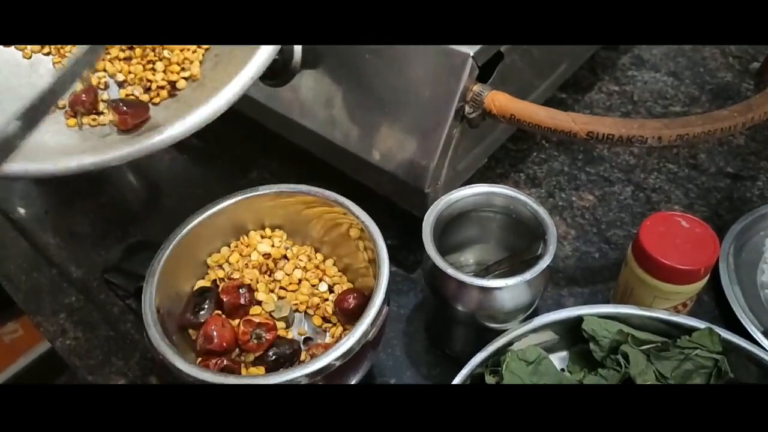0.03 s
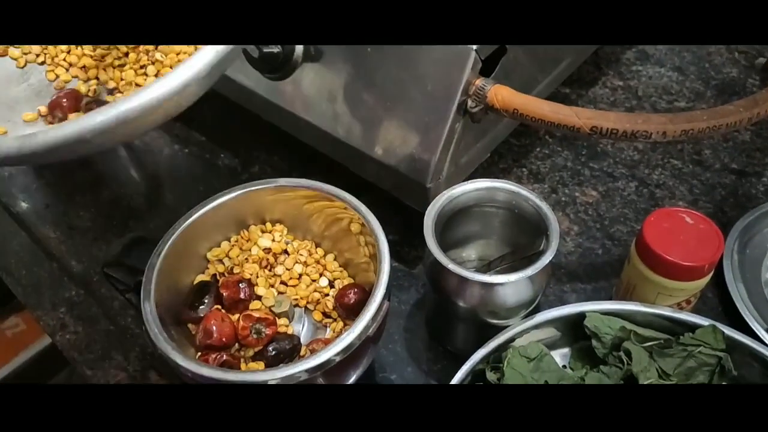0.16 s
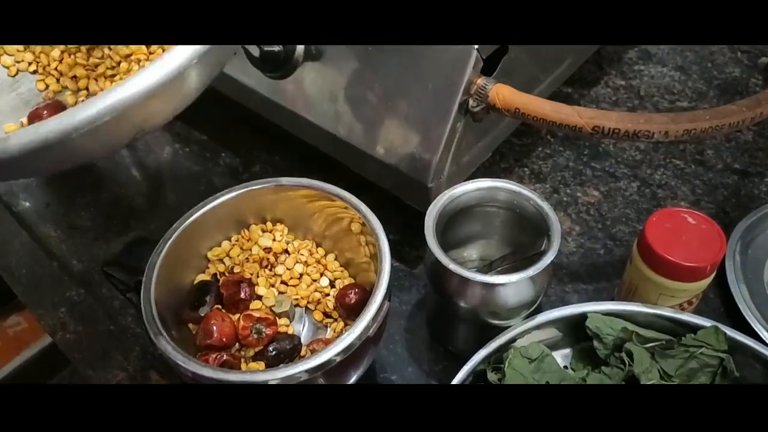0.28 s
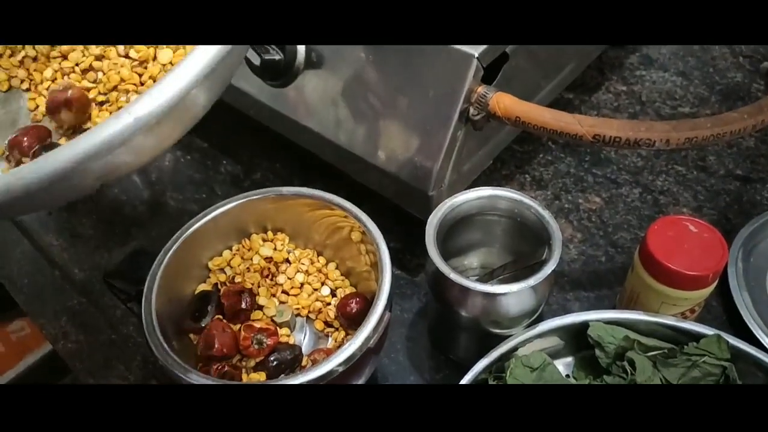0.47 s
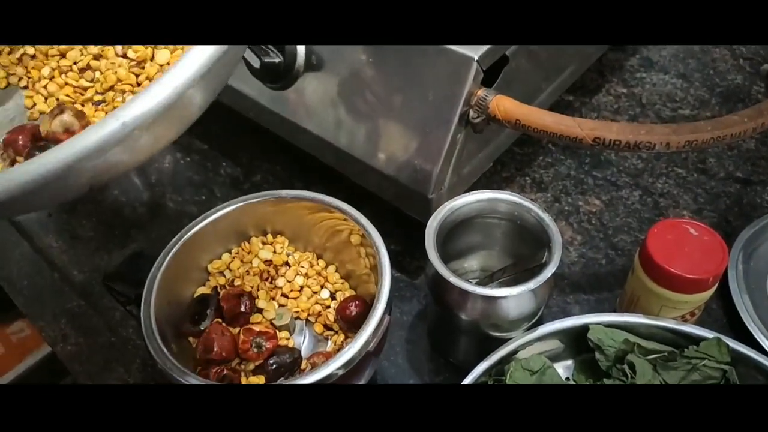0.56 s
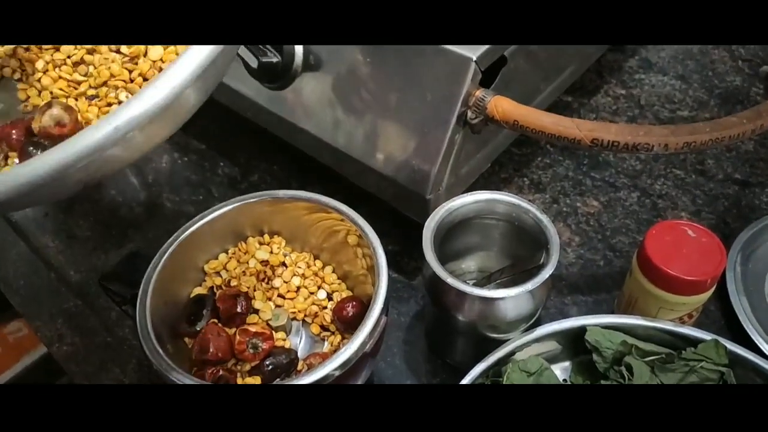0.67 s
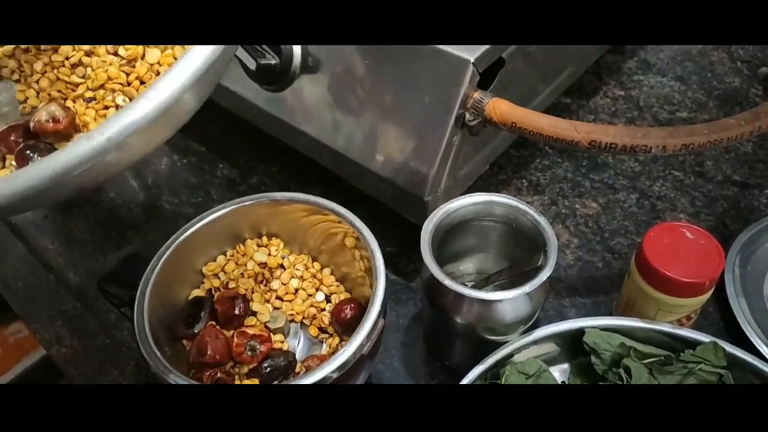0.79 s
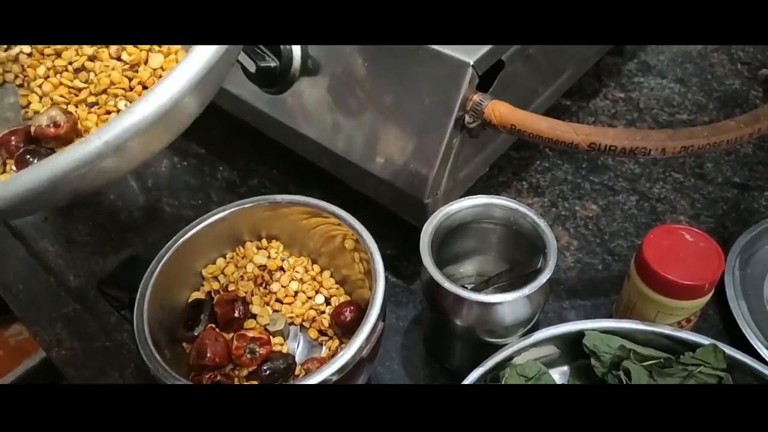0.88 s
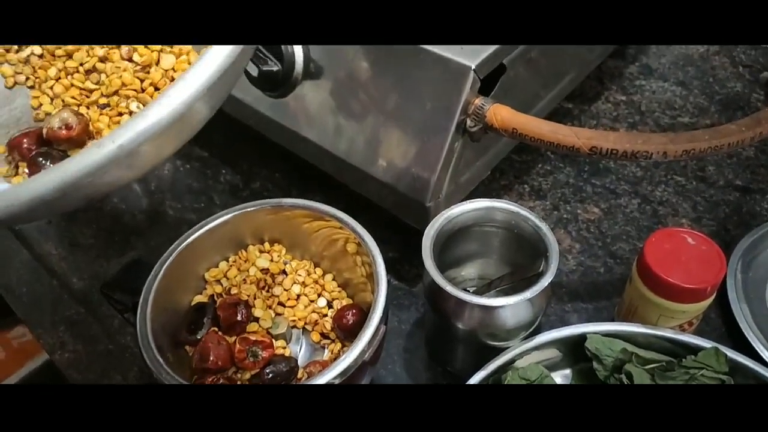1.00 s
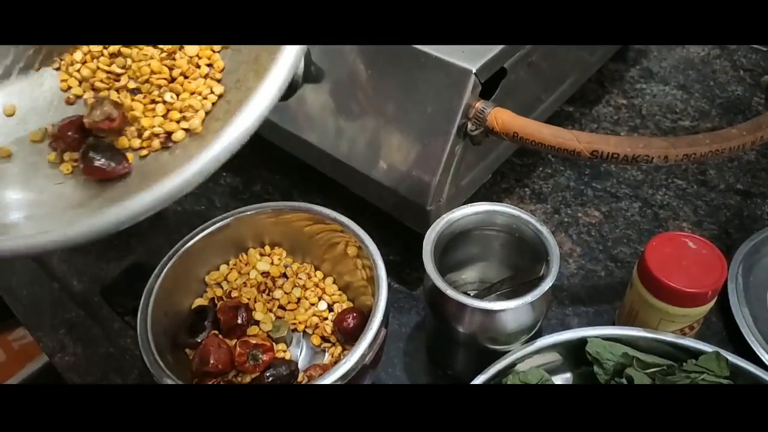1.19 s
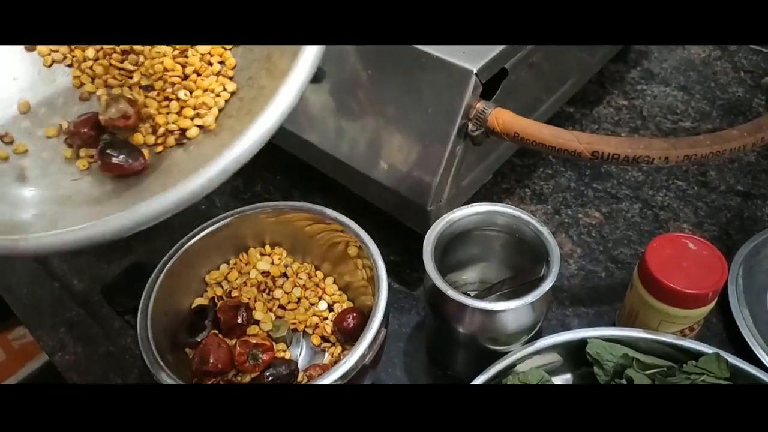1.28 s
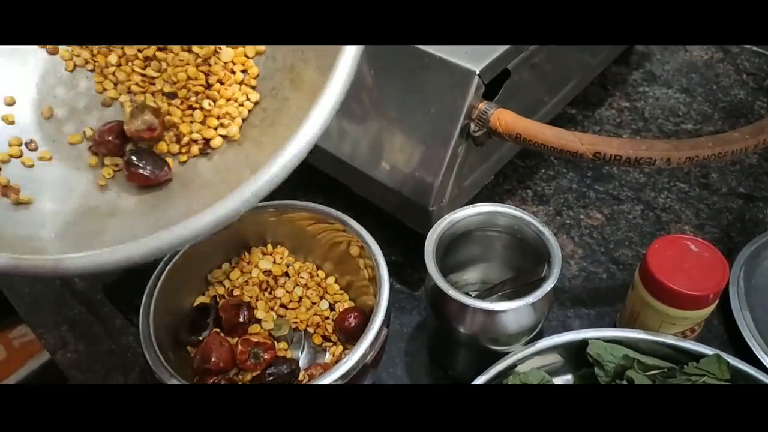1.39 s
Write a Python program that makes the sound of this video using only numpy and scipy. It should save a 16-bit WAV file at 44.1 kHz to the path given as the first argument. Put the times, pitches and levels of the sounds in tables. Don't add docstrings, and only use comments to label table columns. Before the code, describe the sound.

A metal spoon strikes a thin pan of dry lentils twice, the first knock harder and clipping, each ringing briefly as grains rattle and slide; stray ticks, faint hum and hiss, small hard kitchen, close bright stereo microphone.

```python
import sys
import numpy as np
from scipy import signal
from scipy.fft import rfft, irfft
from scipy.io import wavfile
from scipy.ndimage import uniform_filter1d

SR = 44100
rng = np.random.default_rng(int(sys.argv[2]) if len(sys.argv) > 2 else 0)


def wav_out(sig):
    wavfile.write(sys.argv[1], SR, np.round(np.clip(np.atleast_2d(sig).T, -1, 1) * 32767).astype(np.int16))


def decibels_to_gain(level_db):
    exponent = np.asarray(level_db, float) / 20
    return 10 ** exponent


N = 63945
REGRIP_S = 1.0
BURST_SIZE = SR // 2
ROOM_T60_S = 0.34
MODE_SPLIT = 0.022


def unit(x):
    return x / np.sqrt(np.mean(x ** 2) + 1e-20)


def at_hz(points, hz):
    p = np.array(points)
    return np.interp(np.log(np.maximum(hz, 1)), np.log(p[:, 0]), p[:, 1])


def above(x, hz):
    return signal.sosfilt(signal.butter(4, hz, "high", fs=SR, output="sos"), x)


def add(out, x, s, pan_db):
    i = int(s * SR)
    out[:, i:i + x.shape[1]] += (x * decibels_to_gain([[pan_db / 2], [-pan_db / 2]]))[:, :N - i]


# frequency in Hz, likeness from -1 to 1.
PORT_LIKENESS = [(30, 0.94), (70, -0.49), (130, 1), (300, 0.7), (700, 0.4), (1400, -0.019), (3000, 0.031)]


def noise(spectrum, size):
    hz = np.arange(size // 2 + 1) * SR / size
    mid, side = rfft(rng.standard_normal((2, size))) * decibels_to_gain(at_hz(spectrum, hz)) * (hz > 15)
    alike = np.clip(at_hz(PORT_LIKENESS, hz), -1, 1)
    return unit(irfft(np.sqrt(1 + alike) * mid + np.sqrt(1 - alike) * side * [[1], [-1]], size))


def dying(t60_s, size, rise_s=0.00052):
    t = np.arange(size) / SR
    return (1 - np.exp(-t / rise_s)) ** 2 * decibels_to_gain(-60 * t / t60_s)


def contact(spectrum, t60_s):
    room = decibels_to_gain(-12) * dying(ROOM_T60_S, BURST_SIZE, 0.00053)
    return noise(spectrum, BURST_SIZE) * (dying(t60_s, BURST_SIZE) + room)


def modes(table, split=0., size=BURST_SIZE):
    hz, db, t60_s = np.repeat(np.array(table), 5, axis=0).T[:, :, None]
    t = np.arange(size) / SR
    level_chance, phase_chance, pitch_chance = rng.standard_normal((3, 2, len(hz), 1))
    spread = np.tile(np.linspace(-1.3, 1.3, 5), len(table))[:, None] + 0.25 * pitch_chance[0]
    lag_s = 0.0003037 * np.array([1, 0])[:, None, None]
    phase = 2 * np.pi * hz * (1 + split * spread) * (t - lag_s) + 0.92 * phase_chance
    level = decibels_to_gain(db - 12 + 2.26 * level_chance - 60 * t / t60_s)
    return -np.sum(level * np.sin(phase), axis=1) * (1 - np.exp(-t / 0.0002))


def peaks(table):
    return [(hz, db, 5.0 / max(width_hz, 40)) for hz, width_hz, db in table]


# start in seconds, crack in dB, pan ring in dB, left-right in dB.
KNOCKS = [
    (0.3474, 17.5, 5.5, -2),
    (1.0123, 14.5, 6, -2.5),
]
# frequency in Hz, density in dB per Hz.
CRACK_COLOURS = [
    [(59, -74.5), (100, -9.5), (804, 6.5), (3000, -10), (6060, -0.5), (7640, 6), (9430, 3.5), (10300, 4.5),
     (15300, -18)],
    [(59, -55), (100, -27.5), (912, -8.5), (2670, -17.5), (3290, -10), (3980, -15.5), (6320, -6.5),
     (10700, -1.5), (15300, -22.5)],
]
# frequency in Hz, level in dB, t60 in seconds.
PAN_LEVEL = [(187, -20.5, 0.092), (310.2, -12.5, 0.39), (354, 3.5, 0.036), (500, -13.5, 0.7),
             (611.7, 2, 0.34), (692, 4, 0.31), (792, -5, 0.52), (821.5, 6, 0.21), (928, -9, 0.81),
             (1052, -4, 0.31), (1232, -16.5, 0.62), (1236, -4.5, 0.37), (1410, -9.5, 0.21),
             (1690, -38.5, 0.45)]
# frequency in Hz, level in dB, t60 in seconds.
PAN_TIPPED = [(317, -56, 0.042), (479, -16, 0.28), (647, -8, 0.24), (637, -17.5, 0.49), (784, -13, 0.42),
              (860, -6.5, 0.34), (924, -24, 0.081), (936, -16.5, 0.44), (1339, -2, 0.396),
              (1487, -19.5, 0.6), (1985, 1, 0.11), (3038, -14.5, 0.43), (3114, -14, 0.41),
              (4250, -26, 0.22)]
# frequency in Hz, width in Hz, level in dB.
RIM_RINGS = [
    [(4390, 41, -11.5), (4890, 42, -11.5), (5196, 17, -6.5), (5330, 78, -3), (6650, 118, -3.5),
     (7900, 120, -0.5), (8597, 150, 0.5), (10480, 87, -0.5), (11620, 91, 5.5), (12200, 75, -9),
     (13000, 42, -17.5), (14270, 8, -16), (14900, 27, -9.5)],
    [(3145, 59, -20.5), (3690, 39, -31), (3920, 36, -40), (4730, 220, -3.5), (6110, 46, -11),
     (7900, 310, -2), (8840, 85, -17), (9070, 100, -1), (10380, 93, 3), (11960, 31, -10.5), (12050, 120, 4),
     (13000, 66, -14.5), (13360, 97, -12)],
]
# frequency in Hz, level in dB, t60 in seconds.
HANDLE_JOLT = [(108, -44, 0.059), (153.5, -18, 0.4), (191, -17, 0.017), (249, -12.5, 0.2)]
JOLT_DB = [-14.5, -16.5]


def knocks():
    out = np.zeros((2, N))
    bodies = [PAN_LEVEL, PAN_TIPPED]
    for knock, colour, body, rim, jolt_db in zip(KNOCKS, CRACK_COLOURS, bodies, RIM_RINGS, JOLT_DB):
        s, crack_db, ring_db, pan_db = knock
        crack = contact(colour, 0.021) + decibels_to_gain(-5.5) * modes(peaks(rim), 0.006)
        ring = modes(body, MODE_SPLIT)
        jolt = modes(HANDLE_JOLT, 0.069)
        hit = decibels_to_gain(crack_db - 12.5) * crack + decibels_to_gain(ring_db - 15.5) * ring + decibels_to_gain(jolt_db) * jolt
        add(out, hit, s, pan_db)
    return above(out, 77)


def through(clicks, response):
    response = unit(response) / np.sqrt(response.shape[1])
    return signal.fftconvolve(clicks[None], response, axes=1)[:, :N]


# frequency in Hz, density in dB per Hz.
GRAIN_COLOUR = [(880, -24), (1500, -14.5), (2280, -18), (2740, -17), (3700, -16), (4160, -16.5),
                (4680, -12.5), (9980, -1), (15300, -20)]


def slide(rows, body, shimmer):
    s, db, low_db = np.transpose(rows)
    t = np.arange(N) / SR
    grains_per_s, grain_spread_db, clump_db = 2000, 3.5, 2
    clump = uniform_filter1d(uniform_filter1d(rng.standard_normal(N), size=150), size=150)
    sizes = decibels_to_gain(grain_spread_db * np.minimum(rng.exponential(1, N), 4)) * rng.choice([-1, 1], N)
    clicks = unit(sizes * (rng.random(N) < grains_per_s / SR) * decibels_to_gain(clump_db * unit(clump)))
    clicks = clicks * decibels_to_gain(np.interp(t, s, db)) * (t > s[0]) * (t < s[-1])
    dealt = rng.integers(0, 4, N)
    out = sum(through(clicks * (dealt == k), contact(GRAIN_COLOUR, 0.011)) for k in range(4))
    out = out + decibels_to_gain(-1) * through(clicks, modes(peaks(shimmer), 0.0046, size=SR // 4))
    out = out + through(clicks * decibels_to_gain(np.interp(t, s, low_db)), modes(body, MODE_SPLIT))
    return out * decibels_to_gain([[-1], [1]])


# time in seconds, rattle in dB, share in the pan's low modes in dB.
SLIDES = [
    [(0.35, -14, 6.5), (0.40, -22.5, -33.5), (0.47, -18.5, -18), (0.51, -26, -6.5), (0.58, -21.5, -9),
     (0.63, -15, -16), (0.67, -32.5, -10), (0.72, -45, -7), (0.78, -59.5, 14)],
    [(1.015, -10.5, -16.5), (1.05, -27, 5), (1.10, -22.5, -50), (1.14, -30, -16), (1.18, -51, -10),
     (1.23, -44, -1.5)],
    [(0.17, -40.5, -20.5), (0.19, -41, -26.5), (0.23, -37, -46), (0.27, -49.5, -38), (0.31, -42, -23)],
    [(1.26, -45, -4.5), (1.34, -44.5, -18), (1.41, -37.5, -30), (1.449, -62, -47)],
]
# frequency in Hz, level in dB, t60 in seconds.
PAN_SLIDING = [(476, -5, 0.13), (544, -4, 0.064), (631, -2, 0.33), (710.3, 5, 0.092), (795, -4, 0.46),
               (882, 3.5, 0.17), (965, 0.5, 0.12), (1135, -2.5, 0.05), (1370, 1, 0.54), (2180, -4.5, 0.013),
               (2284, 1, 0.093), (3090, -10, 0.17), (3790, -4.5, 0.064)]
# frequency in Hz, width in Hz, level in dB.
SHIMMER_LEVEL = [(3290, 62, -22.5), (3615, 78, -13.5), (4630, 78, -27), (4960, 51, -24), (5675, 38, -7.5),
                 (6120, 42, -17), (6640, 38, -24), (7480, 16, -5.5), (8700, 31, 3.5), (9630, 32, -2),
                 (10540, 25, -6), (10350, 41, -9.5), (11000, 78, -8.5), (11200, 160, -7.5)]
# frequency in Hz, width in Hz, level in dB.
SHIMMER_TIPPED = [(3120, 52, -13), (3636, 40, -8), (4650, 120, -2), (7120, 92, -22), (6860, 37, 1.5),
                  (7900, 26, -9), (7900, 56, 3.5), (8340, 53, 12), (10040, 48, -16.5), (10600, 55, -27),
                  (11600, 71, -8.5), (11800, 110, -4)]


def slides():
    out = np.zeros((2, N))
    for rows in SLIDES:
        shimmer = SHIMMER_LEVEL if rows[0][0] < REGRIP_S else SHIMMER_TIPPED
        out = out + slide(rows, PAN_SLIDING, shimmer)
    return above(out, 366)


# frequency in Hz, width in Hz, depth from 0 to 1.
RADIATION_DIPS = [
    [(3600, 200, .6), (4300, 150, .5), (5800, 250, .9), (7080, 300, .92), (8350, 200, .5), (12000, 300, .8),
     (13500, 300, .7)],
    [(3484, 150, .8), (4216, 300, .97), (5530, 350, .97), (7120, 300, .92), (8550, 200, .5),
     (11300, 300, .6), (12800, 300, .8), (14200, 400, .8)],
]


def radiate(x, dips):
    for hz, width_hz, depth in dips:
        notched = signal.lfilter(*signal.iirnotch(hz, hz / width_hz, SR), x)
        x = x + np.clip(depth, 0, 1) * (notched - x)
    return x


# start in seconds, peak in dB, pitch in Hz, left-right in dB, burst t60 in seconds.
TICKS = [(0.0264, -33, 9600, -6, 0.023), (0.1778, -20.5, 7000, -2.5, 0.072),
         (0.2120, -12, 9160, 0.5, 0.019), (0.221, -9.5, 8700, -5, 0.0071), (0.2345, -10, 8700, 6, 0.016),
         (0.4445, -6.5, 9400, 3, .015), (0.4670, -7, 10500, -4.5, 0.017), (0.6173, -8.5, 10000, 4, .012),
         (0.7185, -25.5, 8700, 2, .01), (1.1032, -10, 8370, -4, 0.02), (1.162, -14.5, 8600, 6.5, 0.023),
         (1.253, -16, 9110, -2, 0.027), (1.3164, -17.5, 8000, -2.5, 0.015),
         (1.3457, -14.5, 8700, -2, 0.013), (1.3999, -21, 6700, 0, 0.0099), (1.416, -25.5, 9190, -5, 0.0073)]


def ticks():
    out = np.zeros((2, N))
    t = np.arange(BURST_SIZE) / SR
    room = decibels_to_gain(-13) * dying(ROOM_T60_S, BURST_SIZE, 0.005)
    for s, db, hz, pan_db, t60_s in TICKS:
        burst = dying(0.85, BURST_SIZE) * decibels_to_gain(-60 * np.maximum(t - 0.0035, 0) / t60_s)
        echo = decibels_to_gain(-13) * np.roll(burst, int(0.0097 * SR))
        grain = noise(GRAIN_COLOUR, BURST_SIZE) * (burst + echo + room)
        grain = grain + modes([(hz, -4, 0.015)], 0.017)
        add(out, decibels_to_gain(db - 11.5) * grain, s - 0.0006, pan_db)
    return above(out, 3750)


# frequency in Hz, density in dB per Hz.
FLOOR_COLOUR = [(20, 10.5), (160, 1.5), (330, -10.5), (1050, -7.5), (1900, -10.5), (5000, -6), (9500, -4.5),
                (15300, -16)]


def kitchen_floor():
    return decibels_to_gain(-46.5) * noise(FLOOR_COLOUR, N + 1)[:, :N]


# frequency in Hz, left-right in dB.
PORT_BALANCE = [(60, 0), (150, -1.5), (500, -1.5), (1200, 4), (2500, 7), (5000, 0), (9000, 1), (13000, -2)]


def ports(x):
    tilt_db = at_hz(PORT_BALANCE, np.arange(N // 2 + 1) * SR / N) / 2
    return irfft(rfft(x) * decibels_to_gain([tilt_db, -tilt_db]), N)


def scene():
    pan = slides() + knocks()
    level, tipped = [radiate(pan, dips) for dips in RADIATION_DIPS]
    pan = np.where(np.arange(N) < REGRIP_S * SR, level, tipped)
    return ports(pan + ticks() + kitchen_floor())


# time in seconds, reach in dB.
REACH = [(0.0, 9), (0.04, 7.5), (0.125, -0.5), (0.16, 67), (0.21, 19.5), (0.245, 9.5), (0.30, 19),
         (0.45, 14), (0.495, 6.5), (0.55, 16), (0.65, 17.5), (0.76, 21.5), (0.85, -3.5), (0.995, -8),
         (1.015, 28.5), (1.09, 17), (1.13, 6), (1.18, 19), (1.30, 16), (1.40, 28.5), (1.44, 10)]
# frequency in Hz, extra in dB.
REACH_BY_PITCH = [(150, 9), (450, 0), (1000, 2), (2500, -3.5), (4300, -5), (5700, -6.5), (8000, 10.5),
                  (13000, 14), (15000, 4.5)]


def mute_weak_bands(x):
    jitter_db, knee_db, dip_mute_db = 6, 1.0, 9
    hz, t, z = signal.stft(x, SR, nperseg=1024, noverlap=768)
    band = np.unique((np.sqrt(hz) / 1.2).astype(int), return_inverse=True)[1]
    power = uniform_filter1d(np.mean(np.abs(z) ** 2, axis=0), size=3, axis=1) + 1e-16
    level = 10 * np.log10([power[band == k].mean(axis=0) for k in range(band.max() + 1)])
    jitter = jitter_db * unit(uniform_filter1d(rng.standard_normal(level.shape), size=16, axis=1))
    bright = 10 * np.log10(power[(hz > 7000) & (hz < 12000)].mean(axis=0))
    reach = np.interp(t, *np.transpose(REACH)) + at_hz(REACH_BY_PITCH, hz)[:, None]
    over = (level + jitter)[band] - bright + reach
    for dips, held in zip(RADIATION_DIPS, [t < REGRIP_S, t >= REGRIP_S]):
        dip = sum(depth * (np.abs(hz - at) < width_hz / 3) for at, width_hz, depth in dips)
        over -= dip_mute_db * dip[:, None] * held
    over[(hz > 7400) & (hz < 11500)] = 20
    gate = 0.5 + 0.5 * np.tanh(over / knee_db)
    return signal.istft(z * gate, SR, nperseg=1024, noverlap=768)[1][:, :N]


def limiter_db():
    t = np.arange(N) / SR
    gain_db = np.zeros(N)
    for s, *_ in KNOCKS:
        since = np.maximum(t - s, 0)
        slow_db = -2.5 * np.exp(-since / 0.22)
        fast_db = -5 * np.exp(-since / 0.086)
        gain_db += (t > s - 0.02) * (slow_db + fast_db)
    return uniform_filter1d(gain_db, size=300)


def low_pass(x):
    return signal.sosfilt(signal.butter(12, 15460, fs=SR, output="sos"), x)


def record(dry):
    limited = dry * decibels_to_gain(limiter_db())
    mix = np.clip(mute_weak_bands(limited), -1, 1)
    return low_pass(mix)


dry = scene()
out = record(dry)
wav_out(out)
```